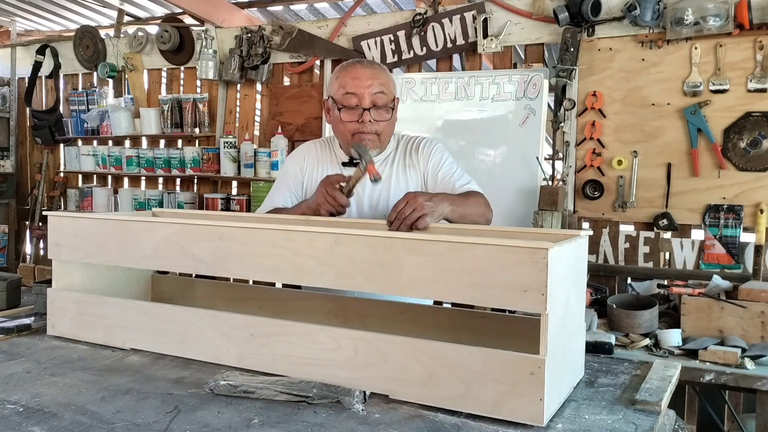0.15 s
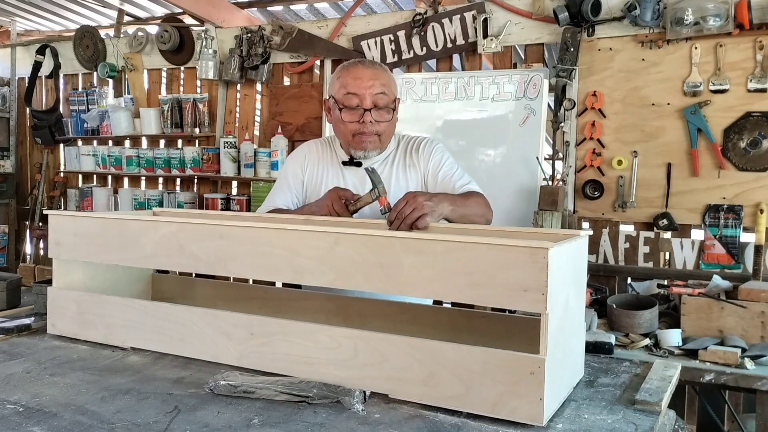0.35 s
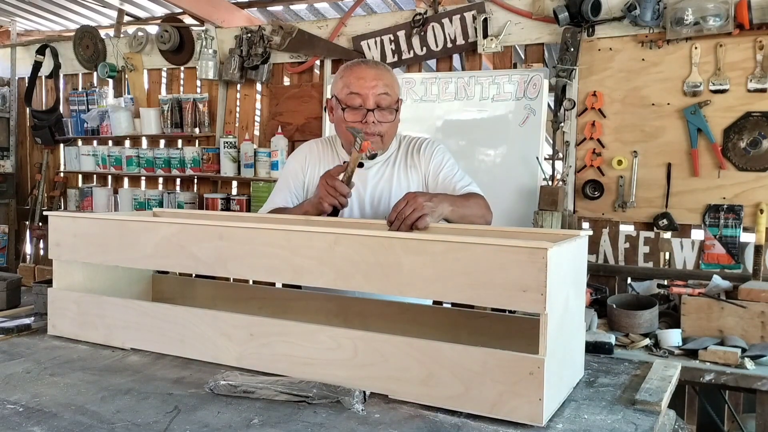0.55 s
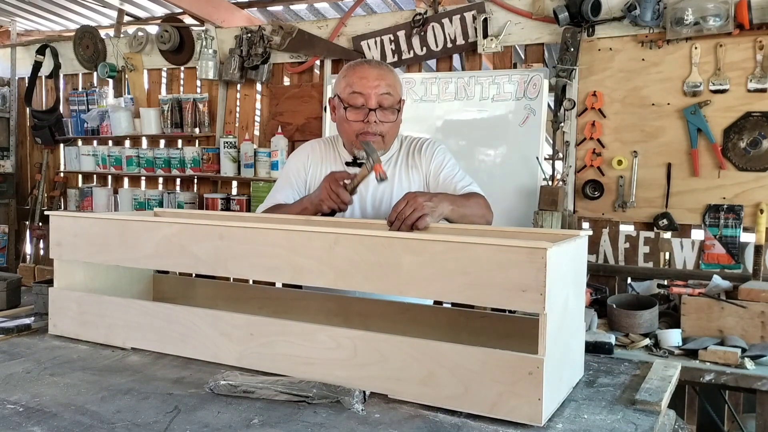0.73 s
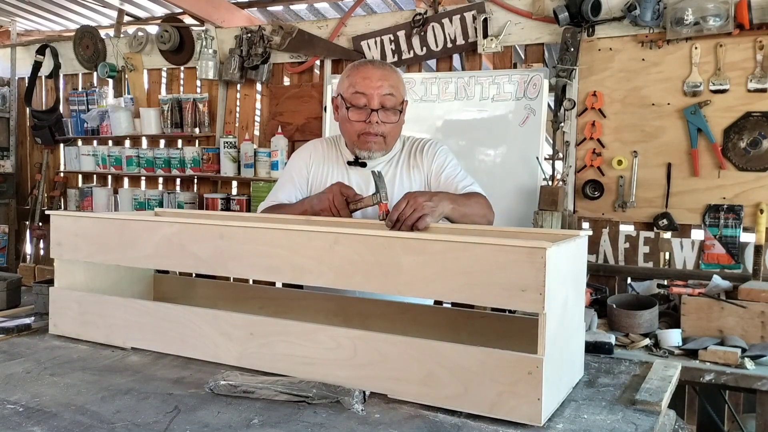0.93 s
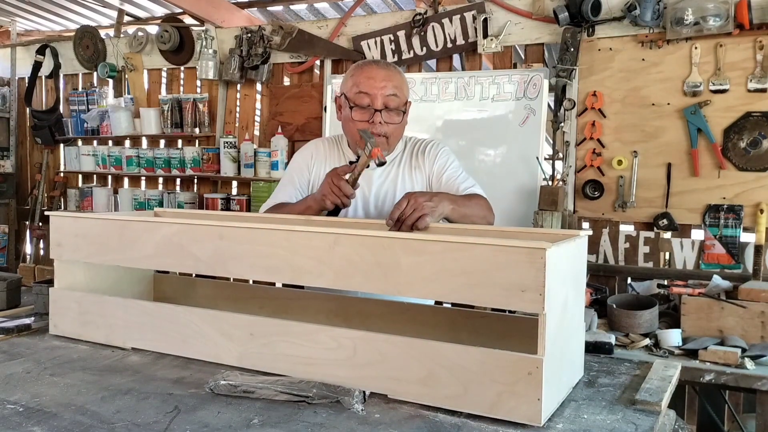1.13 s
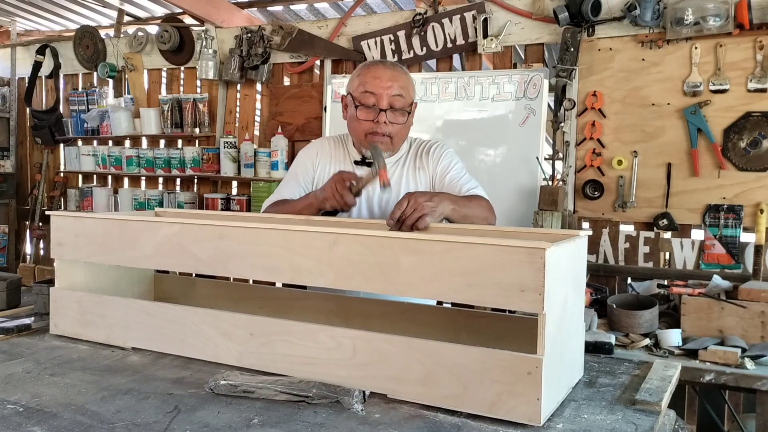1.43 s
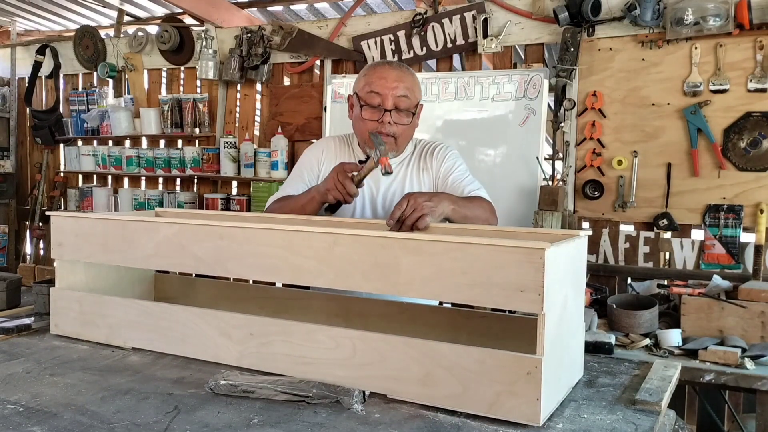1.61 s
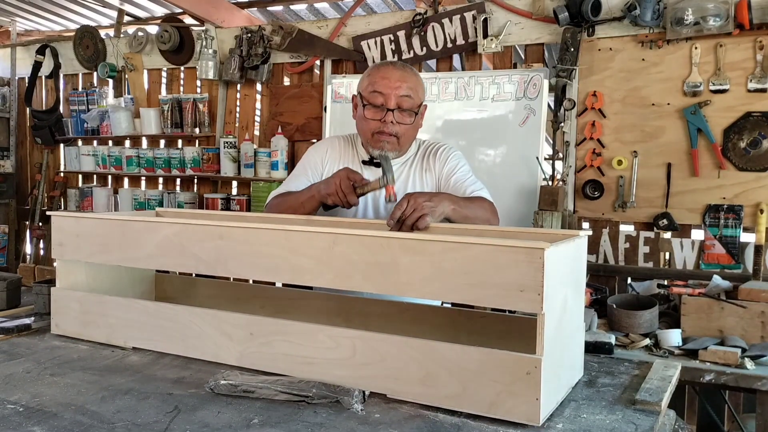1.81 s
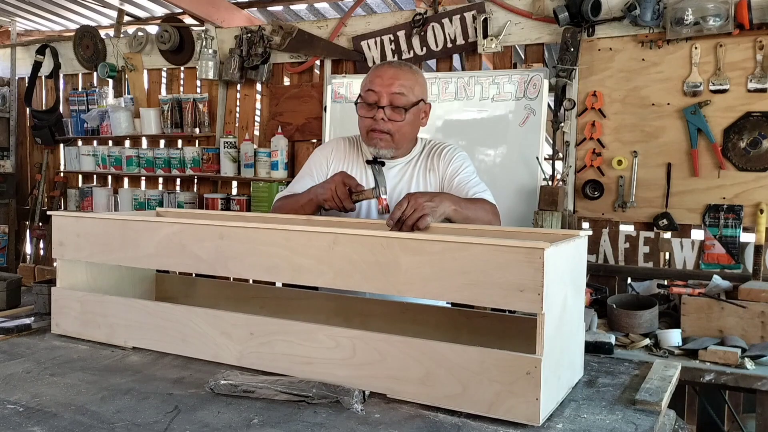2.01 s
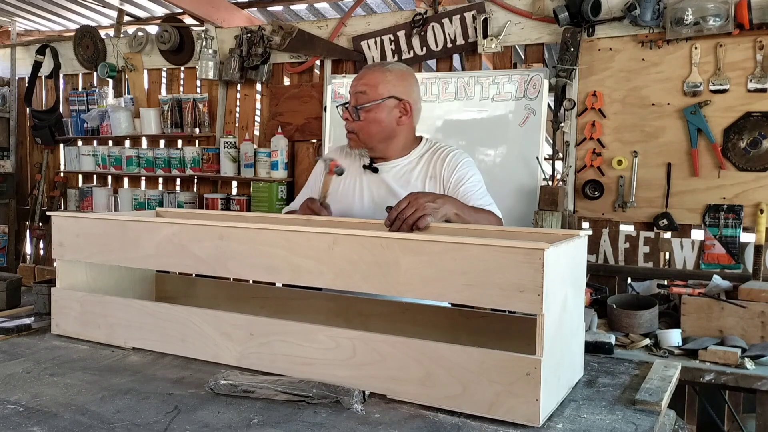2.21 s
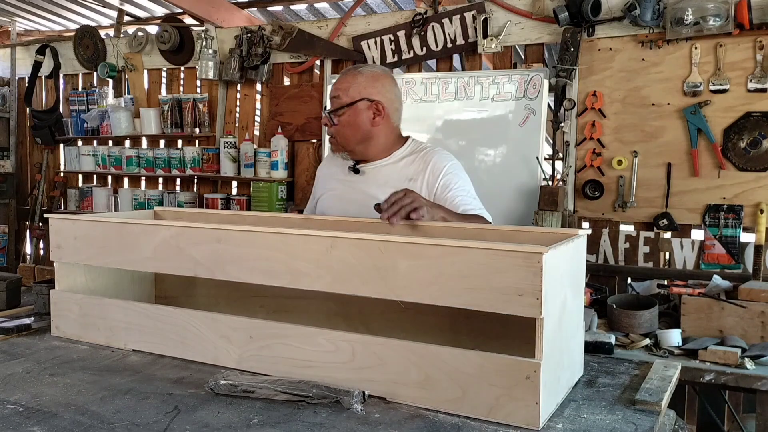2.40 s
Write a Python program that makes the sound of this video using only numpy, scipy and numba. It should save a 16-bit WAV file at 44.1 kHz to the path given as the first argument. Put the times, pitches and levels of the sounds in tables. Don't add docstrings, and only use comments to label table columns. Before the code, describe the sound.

Hammer driving a nail into a hollow plywood box, eight quick sharp, boomy blows in a workshop

```python
import sys
import numpy as np
from scipy import signal
from scipy.fft import rfft, irfft
from scipy.io import wavfile
from scipy.ndimage import uniform_filter1d
from numba import njit

SR = 44100
rng = np.random.default_rng(int(sys.argv[2]) if len(sys.argv) > 2 else 0)


def bounce(signal):
    frames = np.transpose(np.atleast_2d(signal))
    limited = np.clip(frames, -1, 1)
    pcm = np.round(limited * 32767).astype(np.int16)
    wavfile.write(sys.argv[1], SR, pcm)


def decibels_to_gain(level_db):
    exponent = np.asarray(level_db, float) / 20
    return 10 ** exponent


N = 112454
LEAD = 8192


def curve(table, hz):
    points = np.array(table, float)
    return np.interp(np.log(hz + 1), np.log(points[:, 0] + 1), points[:, 1])


def unit(x):
    return x / np.sqrt(np.sum(x ** 2))


def decay(t, t60):
    return 1000. ** (-t / t60)


def colour(table, size):
    hz = np.arange(size // 2 + 1) * SR / size
    cepstrum = irfft(curve(table, hz) * np.log(10) / 20, size)
    cepstrum[1:size // 2] *= 2
    cepstrum[size // 2 + 1:] = 0
    return np.exp(rfft(cepstrum))


def pair(size):
    # f/Hz, correlation
    likeness = [(60, 0.92), (290, 0.96), (640, 0.6), (1400, 0.027), (16000, .02)]
    hz = np.arange(size // 2 + 1) * SR / size
    alike = np.clip(curve(likeness, hz), 0, 1)
    mid, side = rfft(rng.standard_normal((2, size)))
    return mid * np.sqrt(1 + alike) + side * np.sqrt(1 - alike) * np.array([[1], [-1]]), hz


def rumble(size):
    # f/Hz, level/dB
    rumble_tone = [(25, -4), (55, 0), (90, -1), (180, -14), (400, -9), (1000, -17), (5000, -46),
                   (16000, -52)]
    level_db, flicker_db, step = -51, 2.0, 4096
    noise, hz = pair(size)
    x = irfft(noise * decibels_to_gain(curve(rumble_tone, hz)), size)
    flicker = np.repeat(rng.standard_normal(size // step + 1), step)
    flicker = uniform_filter1d(flicker, step)[:size]
    return x / np.std(x) * decibels_to_gain(level_db + flicker_db * flicker)


def panel_ring(t):
    # f/Hz, level/dB, t60/s
    panel_modes = [(97.2, -21.5, 0.67), (152, -20.5, 0.26), (220.4, 5.5, 0.096), (262.5, 11, 0.098),
                   (346, -23.5, 0.033), (391.9, 2, 0.094), (454.8, 4.5, 0.11), (560, 0, 0.24),
                   (715.4, 12.5, 0.033), (799, 2, 0.04), (882, 1.5, 0.061), (968, -35.5, 0.033),
                   (1355, 4, 0.058), (1860, 0, 0.061)]
    scatter_db, detune = 2, .008
    hz, db, t60 = np.array(panel_modes, float).T[:, :, None]
    chance = rng.standard_normal((2, len(hz), 1))
    ring = np.sin(2 * np.pi * hz * (1 + detune * chance[0]) * t) * decay(t, t60)
    return unit(np.sum(decibels_to_gain(db + scatter_db * chance[1]) * ring, axis=0))


def wooden_knock(size):
    # f/Hz, level/dB
    knock_tone = [(59, -53), (100, -19.5), (188, -13.5), (257, -2.5), (459, -6), (647, -17), (755, -7),
                  (6000, -34), (7800, -42.5), (13200, -120)]
    return decibels_to_gain(-1) * unit(irfft(colour(knock_tone, size), size))


def cavity_boom(t):
    hz, beat_hz, t60, level_db = 86.5, 4.65, 1, -10
    beat = np.cos(2 * np.pi * beat_hz * np.maximum(t - .02, 0))
    return decibels_to_gain(level_db) * unit(np.sin(2 * np.pi * hz * t) * beat * decay(t, t60))


def box(boom_db, size):
    t = np.arange(size) / SR
    panels, knock = panel_ring(t), wooden_knock(size)
    to_shed = panels + knock
    direct = decibels_to_gain(2.5) * panels + decibels_to_gain(-3) * knock + cavity_boom(t)
    boom_below_hz, late_s = 330, .002
    shelf = colour([(boom_below_hz / 1.52, boom_db), (boom_below_hz * 1.715, 0)], size)
    wood = irfft(rfft(np.array([to_shed, direct])) * shelf, size)
    return np.roll(wood, int(late_s * SR), axis=1)


def steel_ping(ping_db, size):
    # f/Hz, level/dB
    steel_tone = [(880, -54), (1500, -13), (6170, -11.5), (8860, -18), (12800, -17), (15200, -23.5),
                  (16500, -26)]
    return decibels_to_gain(-14.5 + ping_db) * unit(irfft(colour(steel_tone, size), size))


def nail_crack(crack_db, size):
    # f/Hz, level/dB
    crack_tone = [(500, -59), (1200, 1), (2500, 7.5), (4500, 1), (7000, -13), (11000, -5), (16000, -24)]
    # f/Hz, level/dB, t60/s
    nail_modes = [(1813, 1.5, 0.014), (2830, -1, 0.02), (4060, -0.5, 0.014)]
    hold_s, t60, nail_db, level_db = 0.0032, 0.0073, -3.5, -2.5
    t = np.arange(size) / SR
    noise, _ = pair(size)
    burst = irfft(noise, size) * decay(np.maximum(t - hold_s, 0), t60)
    crack = irfft(rfft(burst) * colour(crack_tone, size), size)
    nail = sum(decibels_to_gain(db) * np.sin(2 * np.pi * hz * t) * decay(t, ring_s) for hz, db, ring_s in nail_modes)
    return decibels_to_gain(level_db + crack_db) * unit(unit(crack) + decibels_to_gain(nail_db) * unit(nail))


def shed(noise, hz):
    # f/Hz, t60/s
    shed_t60 = [(60, 0.25), (160, 0.43), (420, 0.38), (1100, 0.37), (2910, 0.39), (7680, 0.29),
                (16000, .17)]
    level_db, rise_s, late_db, late_stretch = 10.5, 0.0047, -28.5, 2.27
    treble_hold_s, treble_from_hz = 0.038, 13550
    size = 2 * len(hz) - 2
    t, tail = np.arange(size) / SR, 0
    for centre in 30 * 2 ** np.arange(0, 9.6, .5):
        octaves = np.clip(np.log2((hz + 1) / centre), -.5, .5)
        band = irfft(noise * np.cos(np.pi * octaves) ** 2, size)
        hold = treble_hold_s / (1 + (treble_from_hz / centre) ** 4)
        fade = decay(np.maximum(t - hold, 0), curve(shed_t60, centre))
        tail = tail + band * (fade + decibels_to_gain(late_db) * fade ** (1 / late_stretch))
    return decibels_to_gain(level_db) * unit(tail * (1 - np.exp(-t / rise_s))) * np.sqrt(2)


def put_aside(size):
    t = (np.arange(size) - LEAD) / SR
    since_click, since_thud = t - 2.525, t - 2.546
    click = np.sin(2 * np.pi * 9800 * since_click) * np.exp(-(since_click / .0002) ** 2)
    thud = np.cos(2 * np.pi * 108 * since_thud) * np.exp(-(since_thud / .012) ** 2)
    return decibels_to_gain(-59) * click - decibels_to_gain(-36.5) * thud


def microphones(hz):
    right_lag_s, treble_pan_db = -.00004, -4
    side = np.array([[.5], [-.5]])
    return decibels_to_gain(side * treble_pan_db * hz / (hz + 5000)) * np.exp(2j * np.pi * hz * side * right_lag_s)


def scene():
    # t/s, strength/dB, panel boom/dB, steel ping/dB, crack/dB
    blows = [
        (-.085, -5.5, 8, 3, 16),
        (.212, -0.5, 6.5, 4.5, 7.5),
        (0.514, 2.5, 3, -0.5, 2),
        (.802, 6, -1, -7, -2),
        (1.083, 4.5, 1, -4, 1),
        (1.358, 7, -3.5, -14, -1),
        (1.623, 9.5, -6.5, -13, -8),
        (1.884, 11.5, -12, -12.5, -10.5),
        (2.118, 10, -10.5, -13.5, -6.5),
    ]
    size, tail, blow_size = N + LEAD + (N + LEAD) % 2, 32768, 16384
    fresh_share = 0.85
    heard = np.zeros((2, size + 2 * tail))
    common, hz = pair(tail)
    ports = microphones(np.arange(tail + 1) * SR / tail / 2)
    for s, db, boom_db, ping_db, crack_db in blows:
        to_shed, direct = box(boom_db, blow_size)
        to_shed = to_shed + steel_ping(ping_db, blow_size)
        direct = direct + nail_crack(crack_db, blow_size)
        room = shed(np.sqrt(1 - fresh_share) * common + np.sqrt(fresh_share) * pair(tail)[0], hz)
        echo = rfft(to_shed, 2 * tail) * rfft(room, 2 * tail)
        blow = irfft((rfft(direct, 2 * tail) + echo) * ports, 2 * tail)
        i = int(s * SR) + LEAD
        heard[:, i:i + 2 * tail] += decibels_to_gain(db + 7.5) * blow
    return (heard[:, :size] + rumble(size) + put_aside(size))[:, LEAD:LEAD + N]


@njit
def follow(x, attack, release):
    y, level = np.empty(len(x)), 0.
    for i in range(len(x)):
        level += (x[i] - level) * (attack if x[i] > level else release)
        y[i] = level
    return y


def limiter(x):
    ceiling_db, ratio, attack_s, release_s = -6, 10, 0.00074, 0.0054
    peak = np.roll(np.abs(x).max(axis=0), -int(attack_s * SR))
    level = follow(peak, 1 / (attack_s * SR), 1 / (release_s * SR))
    gain = np.minimum(1, decibels_to_gain(ceiling_db) / (level + 1e-9)) ** (1 - 1 / ratio)
    return np.clip(x * gain, -.95, .95)


def top_cut(x):
    return signal.sosfilt(signal.butter(12, 16960, fs=SR, output="sos"), x)


def record(dry):
    bass_cut = signal.butter(3, 62, "high", fs=SR, output="sos")
    treble_cut = signal.ellip(8, .2, 50, 16000, fs=SR, output="sos")
    held = limiter(signal.sosfilt(bass_cut, dry))
    mix = signal.sosfilt(treble_cut, held)
    return top_cut(mix)


dry = scene()
out = record(dry)
bounce(out)
```